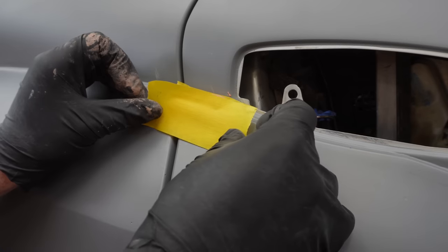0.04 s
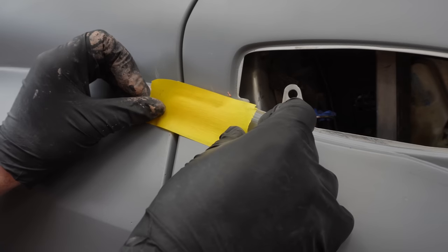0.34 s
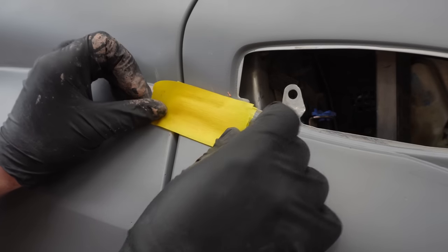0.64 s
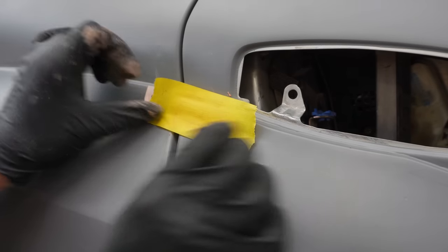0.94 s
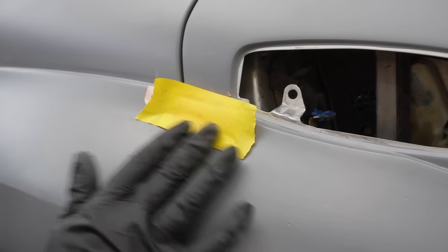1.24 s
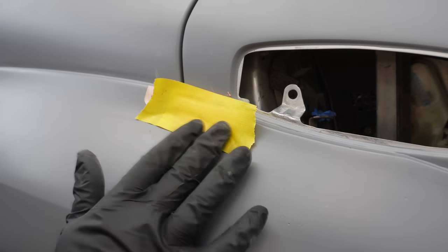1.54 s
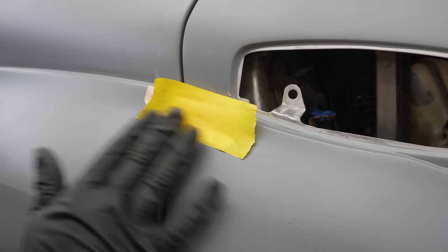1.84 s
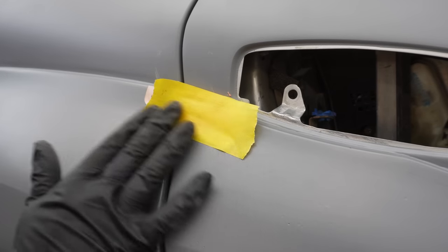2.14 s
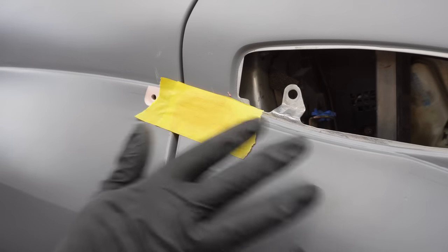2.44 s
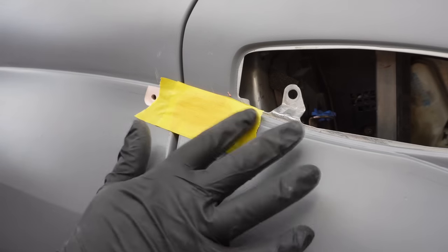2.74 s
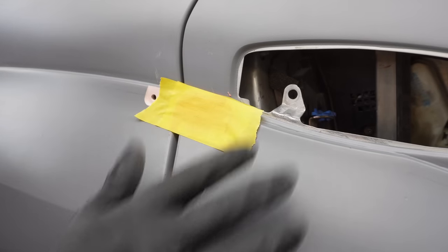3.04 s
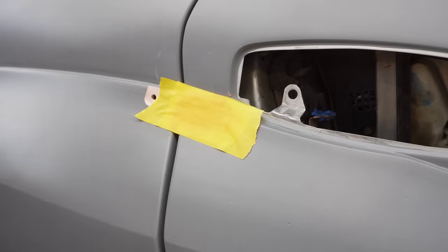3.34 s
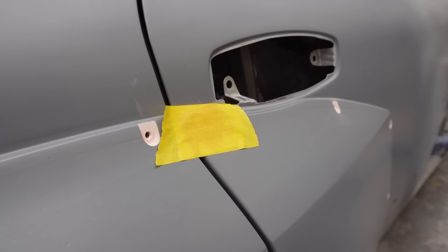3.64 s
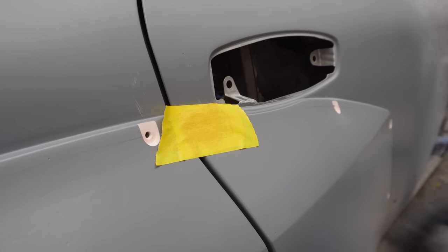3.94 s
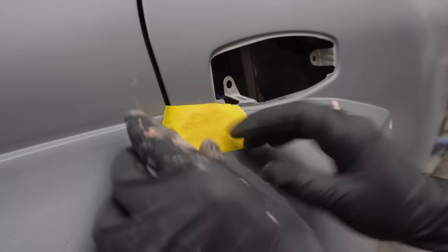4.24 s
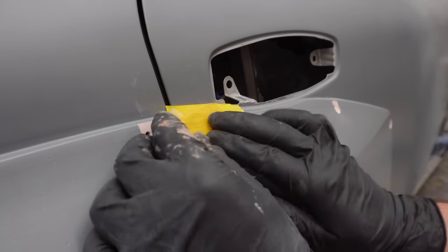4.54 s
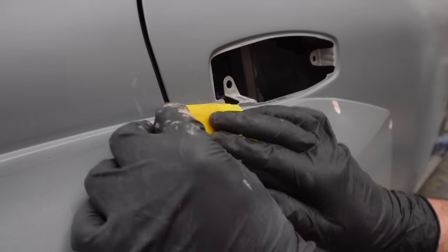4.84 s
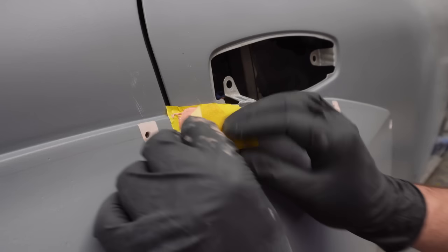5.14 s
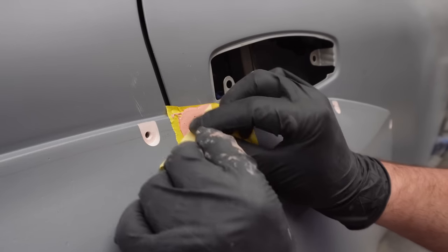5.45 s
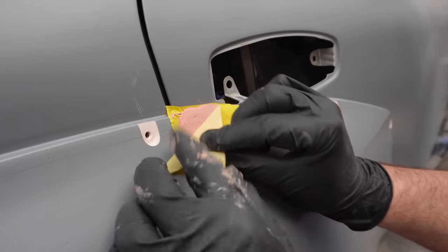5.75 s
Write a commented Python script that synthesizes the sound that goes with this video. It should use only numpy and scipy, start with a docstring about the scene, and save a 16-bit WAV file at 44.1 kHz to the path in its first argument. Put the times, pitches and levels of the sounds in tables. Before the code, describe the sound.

A gloved hand smooths masking tape in quick hissing strokes, then peels it back with crackles and sharp snaps in a workshop.

```python
"""Over the steady air of a workshop, gloved fingers shift on masking tape, which snaps and pops as it is laid
on a car panel; a faint bird chirps outside now and then. From about 1.3 s the glove smooths the tape in quick
strokes, hissing over the ridges of the crepe paper. Around 3.4 s the background grows louder and a low hum is
heard, and a few dull knocks sound while the fingers pick at the tape. From 4.85 s it is peeled back, louder and
louder: the glue lets go in a fine crackle and the bent paper snaps and crinkles."""
import sys
import numpy as np
from scipy import signal
from scipy.fft import rfft, irfft
from scipy.io import wavfile

SR = 44100
rng = np.random.default_rng(int(sys.argv[2]) if len(sys.argv) > 2 else 0)


def store_pcm(level_fs):
    """Save levels as 16-bit WAV."""
    pcm = np.round(np.clip(level_fs, -1, 1) * 32767).astype(np.int16)
    wavfile.write(sys.argv[1], SR, np.atleast_2d(pcm).T)


N = 259308
T = np.arange(N) / SR

# tone of the workshop air: frequency_hz, gain_db
AIR_TONE = [(12, -46), (20, -1), (98, -13), (161, -11), (191, -6.5), (266, -10.5), (491, -13), (565, -14),
            (881, -14.5), (1230, -15), (1630, -17), (1770, -18), (4310, -17.5), (4810, -20.5),
            (15500, -31.5)]
# how loud the motor hums over time: time_s, relative_level_db
HUM_LEVELS = [(3.4, -72), (3.45, -63), (4.13, -53.5), (4.46, -54.5), (4.57, -69), (5.41, -54), (5.46, -67),
              (5.82, -54), (5.88, -56)]
# bird chirps: start_s, length_s, start_pitch_hz, end_pitch_hz, relative_level_db, pitch_jitter_share
CHIRPS = [(0.4, 0.054, 5480, 5300, -68, .03), (0.448, 0.056, 4230, 4500, -67, 0.042),
          (0.967, 0.1, 4090, 3200, -49.5, 0.086), (2.839, 0.15, 4170, 4050, -55.5, 0.029),
          (2.825, 0.088, 5140, 5190, -58, .045), (2.883, 0.05, 3800, 3380, -58, 0.053),
          (3.5, 0.076, 2330, 2570, -57.5, 0.079), (3.561, 0.12, 4570, 3004, -55, .06),
          (3.633, 0.11, 3996, 2806, -56.5, 0.096)]
# dull knocks in the workshop: start_s, relative_level_db, treble_limit_hz
KNOCKS = [(3.39, -35, 1680), (3.66, -45.5, 1090), (3.824, -42, 1100), (4.033, -28.5, 13000),
          (4.046, -30.5, 9000), (4.067, -35, 3000), (4.28, -41, 1000), (4.295, -63, 1500),
          (4.313, -48, 1000), (4.753, -37.5, 880), (4.775, -43.5, 800)]
# tone of a knock: frequency_hz, gain_db
KNOCK_TONE = [(60, -34), (140, -3), (240, 6), (420, 1), (650, 2.5), (950, -4.5), (1350, -8.5), (1680, -1.5),
              (2000, -8.5), (2600, -5.5), (5000, -14.5), (8400, -16), (10500, -22), (15500, -21)]
# fingers shifting on the tape: start_s, length_s, relative_level_db
FINGER_MOVES = [(0.05, .22, -65), (.33, 0.1, -68.5), (0.642, 0.15, -57.5), (0.738, 0.25, -51),
                (0.958, 0.34, -53), (2.368, 0.31, -61.5), (3.05, 0.41, -57), (3.74, .2, -61.5),
                (4.15, 0.44, -60), (4.253, .12, -51.5), (4.559, 0.19, -55.5), (4.716, 0.22, -49.5)]
# tone of their rustle: frequency_hz, gain_db
RUSTLE_TONE = [(200, -5), (450, 0.5), (1500, -1.5), (3300, 1), (6300, -1), (8400, 0.5), (10300, -9.5),
               (12700, -5.5), (15500, -14.5)]
# glove strokes: start_s, length_s, fade_in_s, fade_out_s, hiss_db, swell_db, scrape_above_hiss_db
STROKES = [(1.257, .17, 0.052, 0.044, -47.5, 5, 2.5), (1.463, 0.14, 0.016, 0.05, -39, 18, -2.5),
           (1.625, 0.19, 0.026, .055, -39.5, 0, -3.5), (1.865, 0.16, 0.015, 0.041, -40, 2, -1.5),
           (2.039, 0.17, 0.065, .008, -35, -7, -5.5), (2.233, 0.16, .03, 0.033, -33, 3, -10),
           (2.684, 0.15, 0.031, 0.058, -46.5, -5, -3.5), (2.951, 0.079, 0.012, 0.029, -45, 15, -1.5),
           (3.315, 0.15, 0.054, 0.052, -46, 8, 1.5), (3.484, .16, 0.036, 0.064, -51, 1, 2),
           (4.39, 0.11, 0.021, .02, -50.5, -2, 3.5)]
# a fingertip speeds up as it leaves the tape: peak_time_s, hiss_db
FLICKS = [(1.555, -41), (1.978, -47), (2.36, -33.5), (2.749, -36), (3.012, -30.5)]
# tone of the glove rubbing on paper: frequency_hz, gain_db
GLOVE_TONE = [(150, -23), (400, -19.5), (900, -14), (2000, -11.5), (4400, -7), (6000, -2), (6700, -3.5),
              (7500, 1), (8600, 1.5), (9700, -8.5), (11000, -9), (12500, -6), (14000, -8), (15700, -14.5)]
# pops of the slack tape: start_s, relative_peak_db
POPS = [(0.787, -30), (0.807, -33), (0.821, -32), (0.835, -33), (1.644, -27)]
# tone of the breaking glue: frequency_hz, gain_db
GLUE_TONE = [(180, -23.5), (400, -5.5), (800, -3.5), (1400, 2), (2000, -5.5), (2700, -2), (3500, -3.5),
             (5000, -5.5), (6700, -7.5), (8400, -2), (10200, -11), (12500, -8.5), (15500, -15.5)]
# notes at which the lifted strip rings: pitch_hz, width_hz, gain_db
STRIP_NOTES = [(1260, 220, 0), (1500, 220, -1), (3500, 600, -9)]
# the glue gives way in a jerk: start_s, level_db
TUGS = [(5.143, -34), (5.591, -30), (5.658, -46), (5.804, -35), (5.83, -38)]
# runs of small creases as the tape bends: start_s, length_s, creases_per_s, peak_db
CRINKLES = [(0.788, .07, 70, -28), (5.028, 0.17, 43, -30), (5.221, .65, 30, -28.5)]
# single snaps of the tape: start_s, peak_db, low_flap_db, pitch_hz, top_treble_db
SNAPS = [ (.6625, -26, -9, 3800, 3), (.6687, -26, -13, 6000, -2), (.6968, -28, -6, 3320, -13),
         (0.7306, -11, -1, 3300, 6), (.7339, -2, -4, 3820, 1), (0.7917, -20, 0, 3500, -3),
         (.809, -13, 14, 6500, 14), (0.8496, -15, -2, 5000, 0), (0.8566, -13.5, -4, 6000, 2),
         (.8612, -2, 1.5, 8700, -1.5), (2.5625, -31.5, -7, 8160, 5), (4.225, -30, 23, 4000, 11),
         (4.982, -9, 9.5, 8500, 3), (5.0775, -16.5, -2, 6800, 9), (5.1042, -13, 8, 5200, -11),
         (5.1487, -9.5, 10.5, 5560, 1), (5.158, -6, 2, 6000, -2.5), (5.1885, -11, -15, 6400, 7),
         (5.208, -14, 9.5, 5630, -9), (5.269, -23, 10, 4500, -19), (5.3063, -20, 8, 2100, -3),
         (5.383, -21.5, 4, 8300, 5), (5.4474, -6.5, -12, 3440, 11), (5.4965, -23.5, -8, 3400, -10),
         (5.574, -14, 10, 2500, 4), (5.5889, 0, 11.5, 3380, 6.5), (5.743, -25, 14, 1300, -3),
         (5.8027, -8.5, 12.5, 1250, 13), (5.8198, -0.5, 22.5, 2360, 17.5), (5.857, -8, 6, 3100, 9)]
# tone of the snapping paper: frequency_hz, gain_db
PAPER_TONE = [(200, -20.5), (500, -9.5), (850, -8.5), (1400, -4.5), (1900, -3.5), (2800, 1), (4400, -0.5),
              (5600, -0.5), (7000, -3), (8400, -1), (10000, -11), (13000, -8.5), (16000, -16)]


def undb(db):
    """Turn decibels into a number to multiply by."""
    return 10 ** (np.asarray(db) / 20)


def unit(x):
    """Scale a signal to an average (rms) level of 1."""
    return x / np.sqrt(np.mean(x ** 2))


def add(out, start_s, x):
    """Mix x into out from start_s on."""
    i = int(np.clip(start_s * SR, 0, N - 1))
    out[i:i + len(x)] += x[:N - i]


def band(x, low_hz, high_hz):
    """Keep what lies between two frequencies, with gentle edges."""
    return signal.sosfilt(signal.butter(2, [low_hz, high_hz], "band", fs=SR, output="sos"), x)


def colour(x, tone, size=4096):
    """Filter x with a tone table of frequency_hz, gain_db."""
    hz, db = np.transpose(tone)
    log_gain = np.log(undb(np.interp(np.log(np.fft.rfftfreq(size, 1 / SR) + 1), np.log(hz), db)))
    cepstrum = irfft(log_gain)
    cepstrum[1:size // 2] *= 2  # folded so the filter rings only after a click, never before
    cepstrum[size // 2 + 1:] = 0
    return signal.fftconvolve(x, irfft(np.exp(rfft(cepstrum))))[:len(x)]


def ring(x, notes):
    """Let x set a few quickly dying notes ringing."""
    return sum(undb(db) * signal.lfilter(*signal.iirpeak(hz, hz / width, SR), x)
               for hz, width, db in notes)


def wander(per_s):
    """A random curve of size about 1 that turns per_s times a second."""
    points = rng.standard_normal(int(N / SR * per_s) + 2)
    return unit(np.interp(T * per_s, np.arange(len(points)), points))


def grains(per_s, spread_db):
    """Tiny slips of uneven strength at random moments."""
    strength = undb(spread_db * np.minimum(rng.exponential(size=N), 5))
    return unit((rng.random(N) < per_s / SR) * strength * rng.choice([-1, 1], N))


def shimmer(x, depth_db, per_s, count=9):
    """Half-octave bands swell and sink on their own as the touching area changes shape."""
    spectrum = rfft(x)
    place = np.clip(2 * np.log2((np.fft.rfftfreq(N, 1 / SR) + 1) / 800), 0, count - 1)
    bands = (irfft(spectrum * np.maximum(1 - np.abs(place - k), 0), N) for k in range(count))
    return sum(part * undb(depth_db * wander(per_s)) for part in bands)


def touch(start_s, length_s, fade_in_s, fade_out_s):
    """A touch that eases in, holds and eases off."""
    ramp = np.clip(np.minimum((T - start_s) / fade_in_s, (start_s + length_s - T) / fade_out_s), 0, 1)
    return ramp * ramp * (3 - 2 * ramp)


def workshop_air(step_s=2.89, rise_s=0.68, rise_db=5.5):
    """Airy noise over a low rumble; both step up in loudness from about 2.9 s."""
    running = np.clip((T - step_s) / rise_s, 0, 1)
    air = unit(band(colour(rng.standard_normal(N), AIR_TONE), 146, 17500))
    rumble = unit(band(rng.standard_normal(N), 9.5, 118))
    return (undb(-55.5) * air + undb(-63.5) * rumble) * undb(rise_db * running)


def motor_hum(pitch_hz=96.4, fade_s=0.037):
    """A motor hums on one low note that wavers in pitch and loudness."""
    hz = pitch_hz * (1 + .017 * wander(14))
    hum = unit(np.sin(2 * np.pi * np.cumsum(hz) / SR) * undb(2 * wander(14)))
    times, db = np.transpose(HUM_LEVELS)
    outside_s = np.abs(T - np.clip(T, times[0], times[-1]))
    fade = np.exp(-np.minimum(outside_s / fade_s, 20))
    return hum * undb(np.interp(T, times, db) + 0.2) * fade


def workshop_echo(x, low_fade_s=0.41, high_fade_s=0.33, build_s=0.00067):
    """The room smears sound into a tail that drops 60 dB in each fade time; the treble dies first."""
    t = T[:SR]
    low = band(rng.standard_normal(SR), 95, 3900) * undb(-60 * t / low_fade_s)
    high = band(rng.standard_normal(SR), 3660, 10800) * undb(-60 * t / high_fade_s)
    tail = (low + high) * (1 - np.exp(-t / build_s))
    return signal.fftconvolve(x, tail / np.linalg.norm(tail))[:N]


def bird():
    """A bird gives short sliding whistles, some clear and some raspy."""
    out = np.zeros(N)
    jitter, tremble = wander(1400), undb(2 * wander(400))
    for start, length, start_hz, end_hz, db, rasp in CHIRPS:
        n = int(length * SR)
        hz = np.geomspace(start_hz, end_hz, n) * (1 + rasp * jitter[int(start * SR):][:n])
        whistle = np.sin(2 * np.pi * np.cumsum(hz) / SR)
        add(out, start, undb(db + 6.5) * signal.windows.tukey(n, .5) * whistle)
    return out * tremble


def knocks(decay_s=0.0053, size=1024):
    """Blunt, rattling bumps; a softer one has less treble."""
    out = np.zeros(N)
    for start, db, treble_limit_hz in KNOCKS:
        knock = colour(rng.standard_normal(size) * np.exp(-T[:size] / decay_s), KNOCK_TONE)
        add(out, start, undb(db - 7) * unit(band(knock, 93, treble_limit_hz)))
    return out


def finger_rustle(fade_in_s=0.013, fade_out_s=0.058):
    """Fingertips creep on the paper in a light, uneven rustle with stray ticks."""
    creep = grains(per_s=6500, spread_db=-1.5)
    ticks = undb(-8) * grains(per_s=160, spread_db=3.5)
    rustle = unit(colour(creep + ticks, RUSTLE_TONE) * undb(1.5 * wander(70)))
    return rustle * sum(undb(db + 5.5) * touch(start, length, fade_in_s, fade_out_s)
                        for start, length, db in FINGER_MOVES)


def glove_strokes(flick_rise_s=0.018, flick_fall_s=0.013):
    """Fingertips hiss over the paper's ridges and flat fingers scrape lower; speed lifts the hiss most."""
    tips, flats = (colour(grains(per_s=20000, spread_db=1.85), GLOVE_TONE) * undb(wander(90))
                   for _ in range(2))
    hiss = unit(band(tips, 7000, 15700))
    sizzle = unit(band(flats, 12000, 19000))
    lows = band(band(flats, 190, 5470), 190, 5560)
    scrape = unit(shimmer(lows, depth_db=2.5, per_s=26))
    out = np.zeros(N)
    for start, length, fade_in, fade_out, db, swell_db, scrape_db in STROKES:
        swell = swell_db * np.clip((T - start) / length - .5, -.5, .5)
        rub = hiss * undb(db + swell) + scrape * undb(db + scrape_db + .3 * swell)
        rub += sizzle * undb(-35 + 0.38 * db)  # grows only slowly with a stronger stroke
        out += rub * touch(start, length, fade_in, fade_out)
    for peak_s, db in FLICKS:
        speed = np.exp(-((T - peak_s) / np.where(T < peak_s, flick_rise_s, flick_fall_s)) ** 2)
        out += undb(db) * speed * (hiss + undb(-13.5) * scrape)
    return out


def tape_pops(decay_s=0.00044, size=1024):
    """Slack tape flips over with a soft, hollow pop."""
    out = np.zeros(N)
    pop = band(band(np.exp(-T[:size] / decay_s), 820, 1600), 820, 1680)
    for start, db in POPS:
        add(out, start, undb(db + 1) * pop / np.abs(pop).max())
    return out


def tape_peel(start_s=4.85, fade_in_s=0.011, tug_decay_s=0.011):
    """Glue threads break in little surges and drum on the lifted strip, with a few sudden jerks."""
    breaks = grains(per_s=4500, spread_db=2.9) * undb(1.9 * wander(70))
    tension = undb(2.5 * wander(45))
    crackle = unit(shimmer(colour(breaks, GLUE_TONE), depth_db=1.4, per_s=21))
    strip = unit(ring(ring(breaks, STRIP_NOTES), STRIP_NOTES) * tension)
    elapsed_s = np.maximum(T - start_s, 0)
    pull = crackle * undb(-50 + 13 * elapsed_s)  # the pull on the glue grows steadily
    pull += strip * undb(-73.5 + 26.5 * elapsed_s)  # a longer strip drums louder
    jerks = sum(undb(db) * (T >= at) * np.exp(-np.abs(T - at) / tug_decay_s) for at, db in TUGS)
    return pull * np.minimum(elapsed_s / fade_in_s, 1) + jerks * (crackle + undb(-8) * strip)


def crease(flap_db, pitch_hz, treble_db, note_db=6, width_octaves=0.19, size=1024):
    """The paper buckles in one sharp click and flutters briefly; each crease favours its own note."""
    flutter_s = 0.00074 * 2 ** (flap_db / 25)  # more low flap, longer flutter
    push = 0.26 * rng.standard_normal(size) * np.exp(-T[:size] / flutter_s)
    push[0] = 1  # the sharp click
    hz = np.geomspace(200, 16000, 60)
    paper_hz, paper_db = np.transpose(PAPER_TONE)
    paper = np.interp(np.log(hz), np.log(paper_hz), paper_db)
    flap = flap_db / (1 + (hz / 2200) ** 4)  # a freer strip gives more lows
    treble = treble_db / (1 + (9000 / hz) ** 6)  # a crisper crease has more top
    note = note_db / (1 + (np.log2(hz / pitch_hz) / width_octaves) ** 2)
    click = colour(push, np.c_[hz, paper + flap + treble + note])
    return click / np.abs(click).max()


def tape_crinkles(spread_octaves=0.94):
    """Small creases follow each other with uneven gaps, each with its own strength and note."""
    out = np.zeros(N)
    for start, length, per_s, db in CRINKLES:
        for slot_s in np.arange(start, start + length, 1 / per_s):
            extra_db, pitch_shift = rng.standard_normal(2)
            click = crease(flap_db=-7, pitch_hz=5660 * 2 ** (spread_octaves * pitch_shift), treble_db=0)
            add(out, slot_s + rng.random() / per_s, undb(db + extra_db) * click)
    return out


def tape_snaps(creak_rise_s=0.0029, size=512):
    """Single creases creak, then give way as the tape is stretched and lifted."""
    out = np.zeros(N)
    build_up = np.exp(-T[:size] / creak_rise_s)[::-1]
    for start, db, flap_db, pitch_hz, treble_db in SNAPS:
        creak = unit(colour(rng.standard_normal(size), PAPER_TONE)) * build_up
        add(out, start - size / SR, undb(db - 31) * creak)
        add(out, start, undb(db) * crease(flap_db, pitch_hz, treble_db))
    return out


def scene():
    """The hands are close by, the knocks are further off and the bird is heard only as room echo."""
    near = glove_strokes() + finger_rustle() + tape_peel() + tape_snaps() + tape_pops() + tape_crinkles()
    thuds = knocks()
    echo = workshop_echo(undb(-18) * near + undb(-3) * thuds + bird())
    return (near + thuds + echo + workshop_air() + motor_hum())[None]


def record(dry):
    """Cut away the highest treble, above 15850 Hz."""
    return signal.sosfilt(signal.ellip(10, .2, 80, 15850, fs=SR, output="sos"), dry)


dry = scene()
out = record(dry)
store_pcm(out)
```